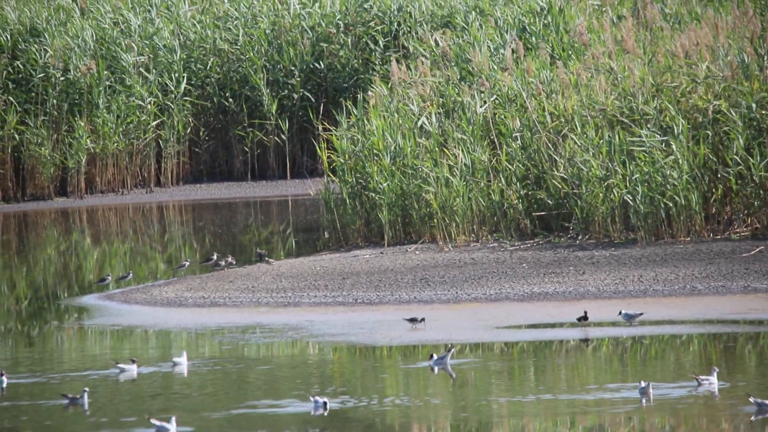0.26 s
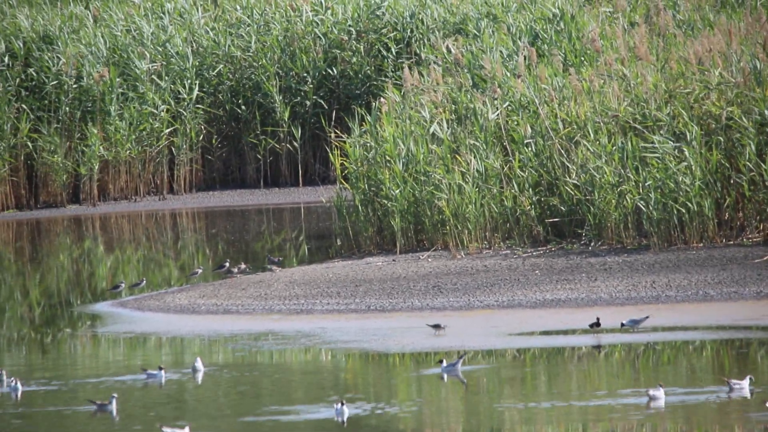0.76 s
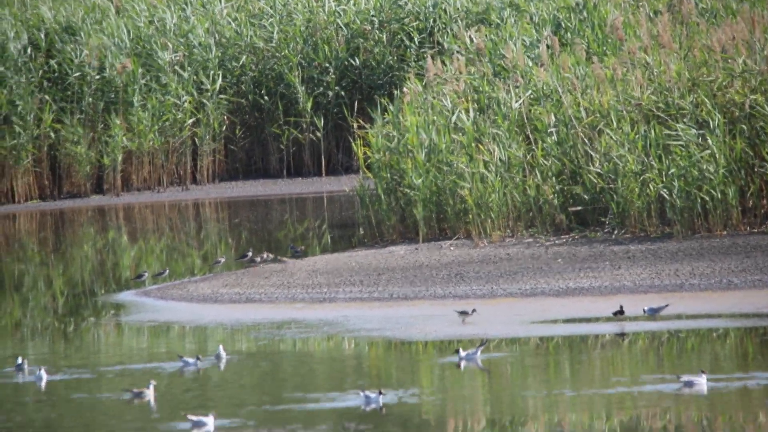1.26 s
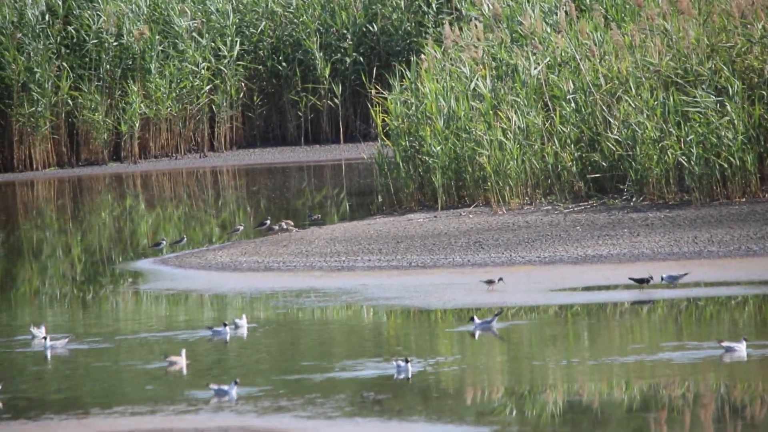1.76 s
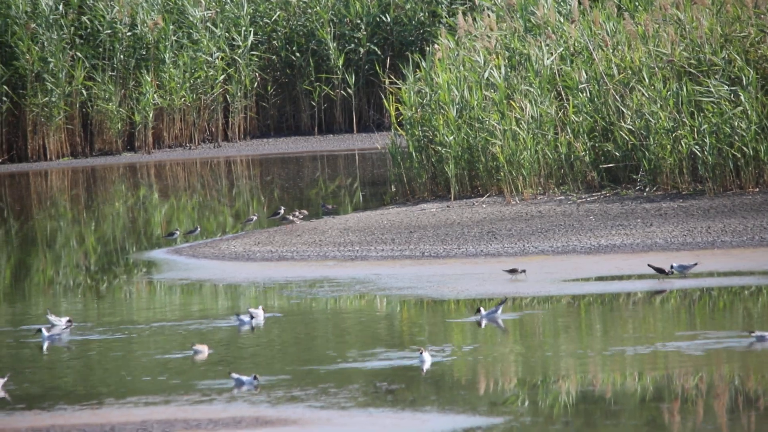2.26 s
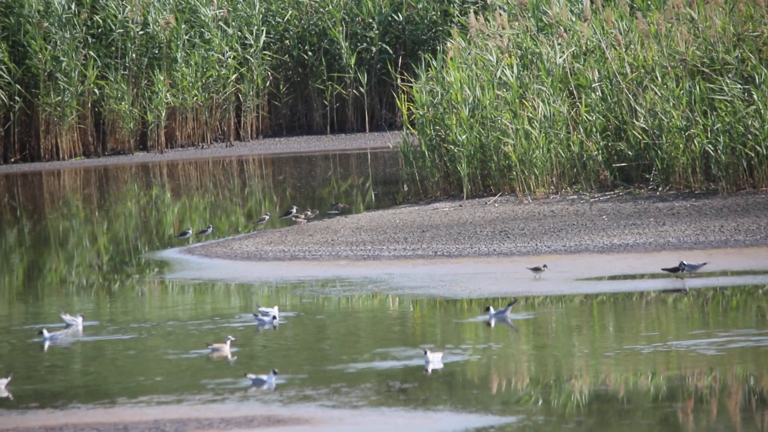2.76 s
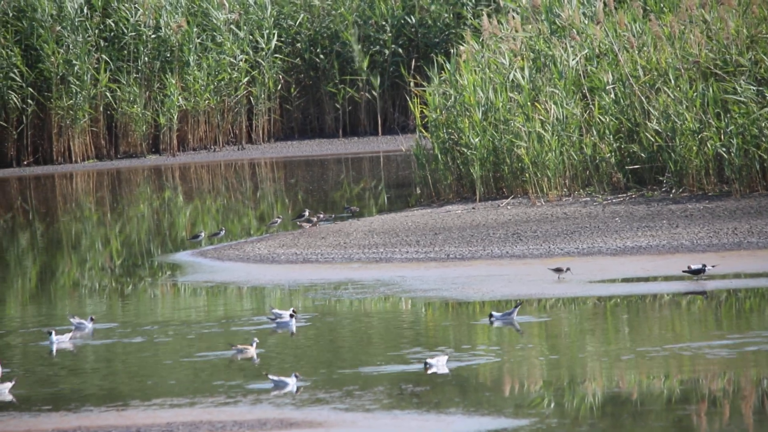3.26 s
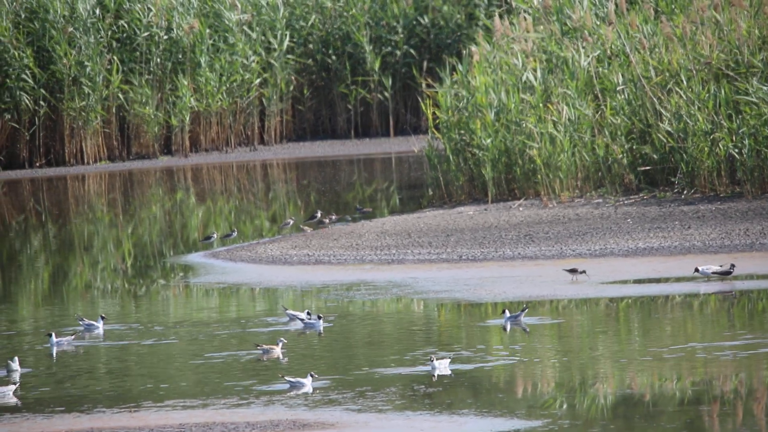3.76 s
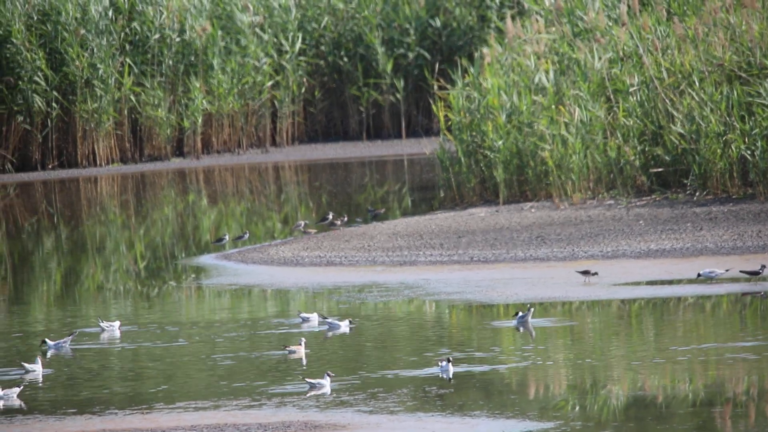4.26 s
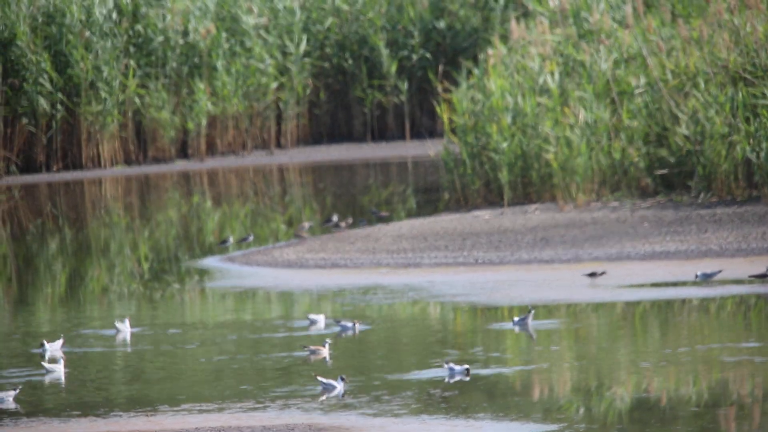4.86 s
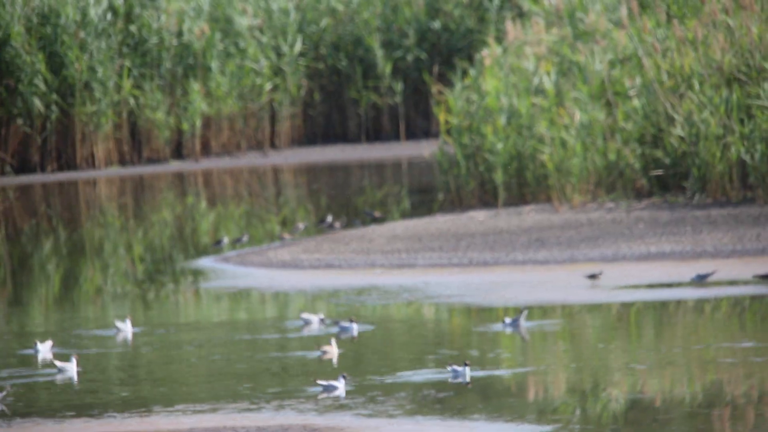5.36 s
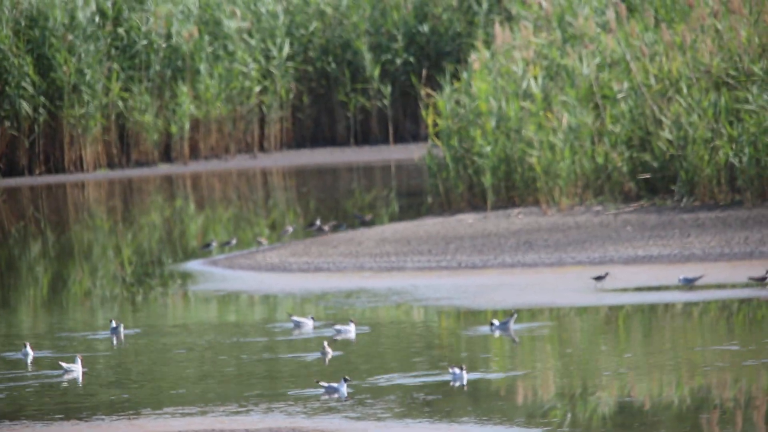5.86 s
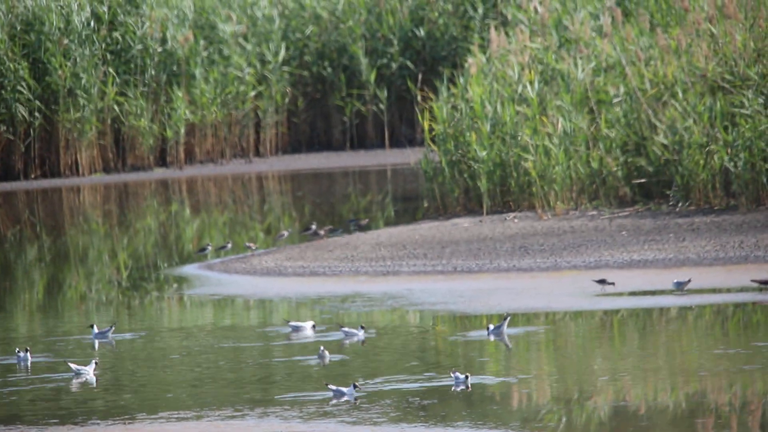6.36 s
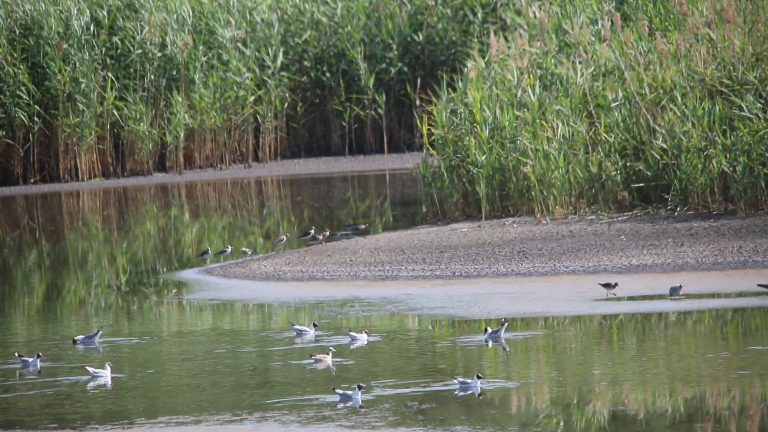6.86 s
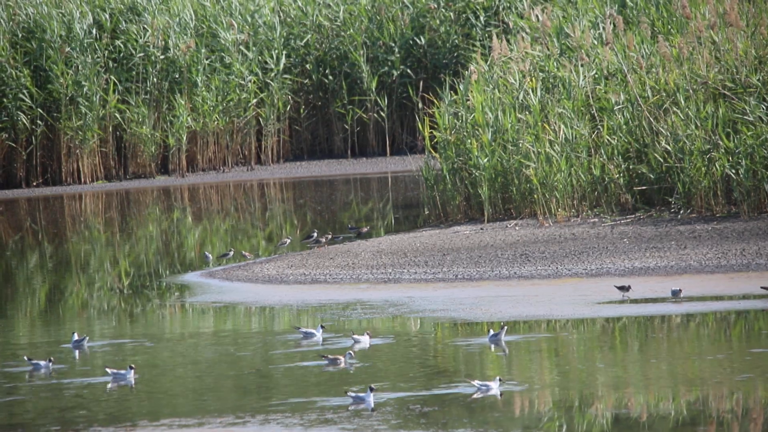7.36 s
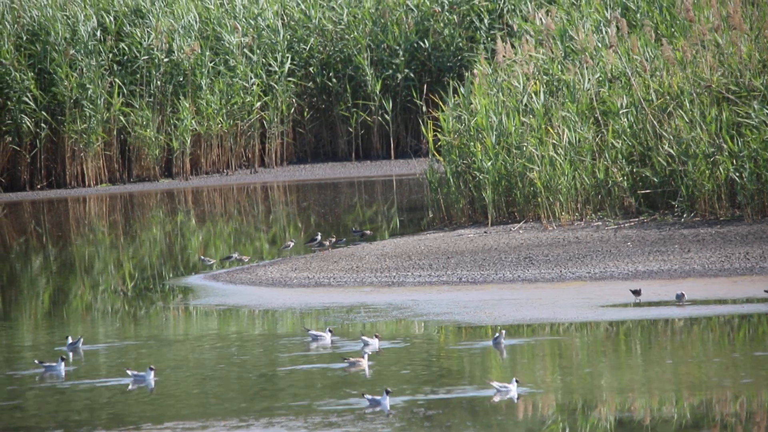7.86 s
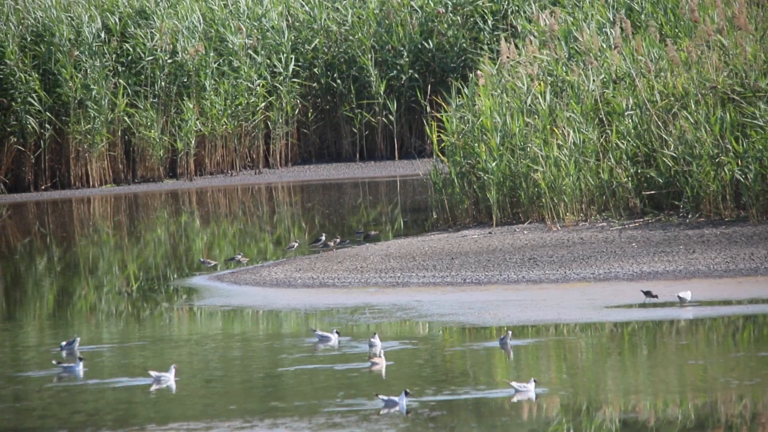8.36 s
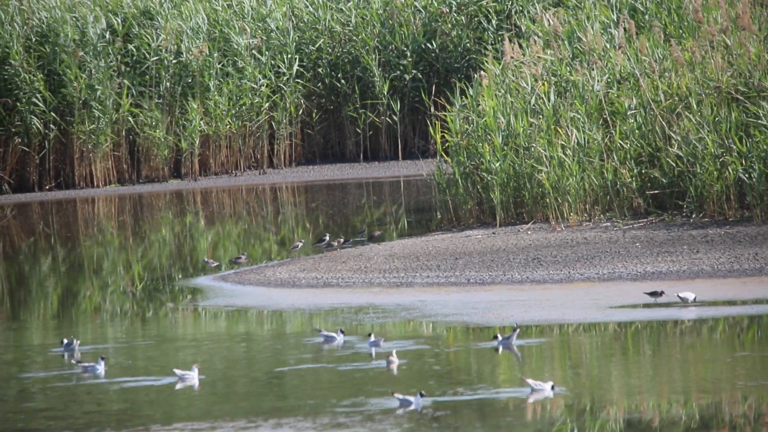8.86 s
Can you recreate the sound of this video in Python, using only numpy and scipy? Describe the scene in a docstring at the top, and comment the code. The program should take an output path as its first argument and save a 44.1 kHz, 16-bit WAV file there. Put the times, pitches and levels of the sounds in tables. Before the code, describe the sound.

Steady short high wader pips, a quick buzzy songbird phrase and faint chirps over a soft reed hush, with low wind buffeting the microphone.

```python
"""Reedy pond, breezy day

Heard from a camera on the bank. A wader to the right repeats a short arched pip, and another bird to the
left sings a slurred, buzzy phrase: both are near sines with drawn pitch curves, scattered by the reeds.
Raspy chips and whistles come from the reeds, with fainter calls from all over the marsh. Shaped noise
makes the gusts at the two microphone ports and the steady hush; decaying modes tick in the camera body."""
import sys
import numpy as np
from scipy import signal
from scipy.fft import rfft, irfft
from scipy.io import wavfile
from scipy.ndimage import uniform_filter1d

SR = 44100
rng = np.random.default_rng(int(sys.argv[2]) if len(sys.argv) > 2 else 0)


def inscribe(sig):
    """Save sig as 16-bit PCM at rate SR to the path in sys.argv[1].

    A 1-D sig is mono; a 2-D sig holds one channel per row.
    Samples are clipped to [-1, 1] before scaling.
    """
    pcm = np.round(np.clip(np.atleast_2d(sig).T, -1, 1) * 32767)
    wavfile.write(sys.argv[1], SR, pcm.astype(np.int16))


N = 402191  # length in samples


def gain_of(db):
    """Decibels to amplitude."""
    return 10 ** (np.asarray(db) / 20)


def evened(x):
    """Scales to rms 1."""
    return x / np.sqrt(np.mean(x ** 2) + 1e-20)


def read(points, hz):
    """Reads a curve of (Hz, value) points on a log-frequency axis."""
    f, value = np.transpose(points)
    return np.interp(np.log(hz + 1), np.log(f + 1), value)


def add(mix, s, sound):
    """Adds a sound into the mix at time s, in place."""
    part = mix[..., max(round(s * SR), 0):][..., :sound.shape[-1]]
    part += sound[..., :part.shape[-1]]


def panned(side_db):
    """Gains of the left and right ports for a left-right difference."""
    return gain_of(np.array([[.5], [-.5]]) * side_db)


def wander(hz):
    """Smooth random curve of about rms 1: noise under a Gaussian low-pass of width hz."""
    size = 2 ** 19
    f = np.fft.rfftfreq(size, 1 / SR)
    spectrum = rfft(rng.standard_normal(size)) * np.exp(-.5 * (f / hz) ** 2)
    return evened(irfft(spectrum)[:N])


def swell(u, top, edge_db, curve):
    """Level in dB of a swell that peaks at u = top and is edge_db down at u = 0 and 1."""
    top = np.clip(top, .05, .95)
    return -edge_db * np.maximum((top - u) / top, (u - top) / (1 - top)) ** curve


def whistle(hz, db):
    """A syrinx tone: a near sine with soft ends."""
    phase = 2 * np.pi * np.cumsum(hz) / SR
    soft_ends = signal.windows.tukey(len(hz), .1)
    return np.sqrt(2) * gain_of(db) * np.sin(phase) * soft_ends


def traced(rows):
    """Joins rows (s, ..) by straight lines: the times and one curve a column."""
    s, *columns = np.transpose(rows)
    t = np.arange(s.min(), s.max(), 1 / SR)
    return [t] + [np.interp(t, np.sort(s), c) for c in columns]


def reeds(x, near_db, near_t60, far_db, far_t60):
    """Stems scatter a call at once; the far reed wall returns a fainter, longer tail (t60 in s)."""
    t = np.arange(SR) / SR
    # sparse random echoes, about 8 % of the samples
    near, far = rng.standard_normal((2, 2, SR)) * (rng.random((2, 2, SR)) < .08)
    near = near * 1000 ** (-t / near_t60) * (1 - np.exp(-t / 0.0059))
    far = far * 1000 ** (-t / far_t60) * (1 - np.exp(-t / 0.11))
    tail = (gain_of(near_db) * evened(near) + gain_of(far_db) * evened(far)) / np.sqrt(SR)
    return signal.fftconvolve(x, tail, axes=1)[:, :N]


def wader(side_db=-5.5, trim_db=1.0, near_db=-12, far_db=-19, echo_s=.027, echo_db=-12):
    """Each pip is a short arch of pitch; on the rise the voice may break to a lower note for an instant."""
    # pips: loudest_s, level_db (before trim_db), top_pitch_hz, rise_s, voice_break (0-1)
    pips = [(.735, -44.5, 3040, 0.029, 0), (1.168, -45.5, 3030, 0.034, .35), (1.538, -47, 2980, 0.038, 0.2),
            (1.899, -47, 3000, .042, .45), (2.253, -44.5, 2984, 0.04, .85), (2.613, -44.5, 2996, .046, 0.3),
            (2.948, -43.5, 3000, .041, .95), (3.284, -41.5, 3040, 0.038, 1),
            (5.117, -34.5, 2950, .031, 0.2), (6.724, -43, 2970, .03, .3), (7.344, -44.5, 2970, .03, 0.6),
            (7.987, -40.5, 2936, 0.031, 0.64)]
    # rise: time (share of rise_s from the loudest moment), pitch (factor), level_db (relative)
    pip_rise = [(-1, .8, -17), (-.75, .94, -8), (-.5, .99, -6.5), (-.3, 1, -4), (-.12, .98, -1)]
    # fall: time_s (from the loudest moment), pitch (factor), level_db (relative)
    pip_fall = [(0, .945, 0), (.007, .905, -3.5), (.016, .87, -15), (.025, .87, -24)]
    break_at, break_width = 0.63, 0.18  # time before the loudest moment and half width, shares of rise_s
    break_pitch, break_db = .69, -7.5  # pitch factor, level relative to the pip

    voice, out = np.zeros(N), np.zeros((2, N))
    for s, db, hz, rise_s, breaks in pips:
        rise = [(share * rise_s, pitch, level) for share, pitch, level in pip_rise]
        t, bend, swell_db = traced(rise + pip_fall)
        low = np.clip(breaks, 0, 1) * np.exp(-((t / rise_s + break_at) / break_width) ** 4)
        full_note = whistle(hz * bend, db + swell_db)
        broken_note = whistle(hz * bend * break_pitch, db + break_db)
        add(voice, s + t[0], (1 - low) * full_note + low * broken_note)
    # the bird is to the right, so the left port hears it later
    add(out[0], .00016, voice)
    add(out[1], 0, voice)
    out = out * gain_of(trim_db)
    heard = out * panned(side_db)
    heard = heard + reeds(out, near_db=near_db, near_t60=0.14, far_db=far_db, far_t60=0.85)
    # the ragged edge of the bank smears its echo
    bank = evened(rng.standard_normal((2, SR // 30))) / np.sqrt(SR // 30)
    add(heard, echo_s, gain_of(echo_db) * signal.fftconvolve(out, bank, axes=1))
    return heard


def songbird(buzz_hz=105, side_db=9.0, trim_db=-11.0, near_db=-1.5, far_db=-13):
    """Each syllable is one swelling bend of pitch; a fast uneven flutter of the pitch makes it buzz."""
    # syllables: start_s, length_s, first_hz, middle_hz, last_hz, level_db (before trim_db),
    # loudest_point (0-1), buzz_depth_hz
    song = [(3.456, .115, 4490, 4850, 4120, -47.5, 0.2, 300),
            (4.421, .03, 4410, 5040, 4700, -35.5, 0.34, 50), (4.441, 0.034, 4650, 4290, 3700, -39, 0.4, 50),
            (4.476, 0.027, 3610, 2990, 3750, -38, 0.95, 50),
            (4.562, 0.035, 2900, 4000, 5300, -41, 0.84, 450), (7.755, .13, 3150, 3220, 3370, -51, .6, 200),
            (7.87, 0.041, 3330, 3870, 4370, -40.5, 0.44, 500),
            (7.915, 0.056, 4880, 5000, 4980, -38, 0.1, 55),
            (7.944, 0.028, 4640, 4050, 3960, -33.5, 0.3, 70),
            (8.034, 0.043, 3890, 3703, 3650, -34.5, 0.42, 35),
            (8.07, 0.039, 3694, 3655, 3590, -30.5, .6, 199),
            (8.098, 0.0246, 3570, 3440, 3300, -32.5, 0.4, 35),
            (8.176, 0.023, 5200, 4880, 4650, -39, .5, 380),
            (8.198, 0.028, 4450, 3830, 3870, -31.5, 0.3, 90),
            (8.271, 0.022, 3580, 3370, 3050, -37, 0.4, 40),
            (8.293, 0.065, 3010, 2950, 3210, -40.5, .3, 190),
            (8.349, 0.045, 3150, 3370, 3470, -33, 0.54, 60),
            (8.434, 0.039, 4900, 4880, 5350, -37.5, .5, 380),
            (8.467, 0.058, 5500, 5680, 5700, -43.5, 0.15, 210),
            (8.629, 0.044, 2570, 3700, 3940, -40, 0.7, 260),
            (8.709, 0.044, 5450, 4870, 4640, -38.5, 0.1, 90),
            (8.714, .045, 5800, 6000, 6050, -47, .45, 330), (8.793, .17, 4350, 3860, 3470, -45.5, 0.5, 403)]
    edge_db, curve = 8.5, 0.59  # drop from the loudest point to either end, roundness of the top

    uneven_hz = buzz_hz * (1 + .12 * wander(25))
    flutter = np.sin(2 * np.pi * np.cumsum(uneven_hz) / SR) + .5 * wander(350)
    out = np.zeros((2, N))
    for s, length, first_hz, middle_hz, last_hz, db, top, buzz_depth_hz in song:
        u = np.linspace(0, 1, int(length * SR))
        # a parabola through the three pitches
        bend = np.polyval(np.polyfit([0, .5, 1], [first_hz, middle_hz, last_hz], 2), u)
        hz = bend + buzz_depth_hz * flutter[int(s * SR):][:len(u)]
        syllable = whistle(hz, db + trim_db + swell(u, top, edge_db, curve))
        add(out, s, syllable * panned(side_db))
    return out + reeds(out, near_db=near_db, near_t60=0.24, far_db=far_db, far_t60=0.88)


def chip(length, first_hz, last_hz, db, rasp_hz, jitter, arch_hz=0):
    """One swelling glide, straight or arched, made raspy by a jitter of the pitch."""
    u = np.linspace(0, 1, max(int(length * SR), 64))
    arch = np.sin(np.pi * u)
    rasp = rasp_hz * jitter[rng.integers(N // 2):][:len(u)]
    hz = first_hz + (last_hz - first_hz) * u + arch_hz * arch + rasp
    return whistle(hz, db) * arch


def reed_birds(chips_trim_db=-3.0, whistles_trim_db=-5.5):
    """The nearer chips and whistles: short raspy glides of pitch, each from its own place."""
    # raspy gliding chips: middle_s, length_s, pitch_hz, fall (share of the pitch, negative rises),
    # level_db (before chips_trim_db), left_right_db
    chips = [(0.618, .07, 3950, -0.21, -59, 8), (0.7, 0.054, 6150, .08, -54, 1),
             (.718, .045, 4620, -.08, -55, 6), (.79, 0.046, 5600, .38, -52.5, 0),
             (0.85, .03, 3570, 0.41, -54, 10), (0.946, .03, 3550, .4, -55.5, 7),
             (1.095, .06, 4560, .15, -59, 9), (1.145, 0.032, 3730, .35, -54, 7),
             (1.252, .025, 3980, .45, -57, 7), (1.616, .036, 6050, .3, -56.5, 1),
             (1.724, .05, 6700, 0.4, -60, 1), (3.133, 0.022, 4520, .16, -50.5, 11),
             (3.166, 0.021, 4320, 0.21, -49, 8), (3.636, 0.013, 5280, .2, -53, 13),
             (4.072, 0.022, 5690, -0.45, -49.5, 12), (4.088, 0.022, 5040, 0.47, -48, 10),
             (4.777, 0.034, 5040, 0.357, -52.5, 12), (4.872, 0.028, 4930, 0.39, -54, 10),
             (4.954, .03, 4320, 0.15, -56, 8), (5.029, 0.021, 5160, .38, -53, 14),
             (5.277, .06, 5280, .08, -61, 7), (5.628, .035, 5050, .1, -58, 13),
             (8.55, 0.079, 2710, 0.4, -56, 10)]
    # soft bent whistles: middle_s, length_s, first_hz, last_hz, arch_height_hz,
    # level_db (before whistles_trim_db), left_right_db
    whistles = [(.008, 0.022, 3040, 2760, 40, -50, 15), (0.081, .08, 2790, 3260, 129, -53, 10),
                (.197, .07, 2330, 2330, 22, -55.5, 1), (0.277, 0.16, 3794, 4100, 35, -51, 8),
                (2.42, 0.056, 3150, 2290, 50, -54.5, 6), (2.559, 0.087, 2650, 2800, 420, -56, 7),
                (2.739, 0.094, 2630, 2640, 500, -54.5, 8), (3.365, 0.028, 3170, 2750, 72, -50, 9),
                (3.936, 0.049, 4430, 4120, -130, -49, 4), (4.604, .6, 2950, 2945, -1, -61.5, 2),
                (5.044, .1, 2930, 2990, 27, -54, 6), (6.38, .11, 3820, 2650, -130, -58, 3),
                (6.535, 0.071, 2280, 3130, 38, -60, 3), (6.752, 0.032, 2960, 2950, 80, -56, 0)]
    chip_rasp, whistle_rasp_hz = 0.06, 55  # the chips' rasp is a share of their pitch

    out, jitter = np.zeros((2, N)), wander(610)
    for s, length, hz, fall, db, side_db in chips:
        first_hz, last_hz = hz * (1 + fall / 2), hz * (1 - fall / 2)
        call = chip(length, first_hz, last_hz, db + chips_trim_db, chip_rasp * hz, jitter)
        add(out, s - length / 2, call * panned(side_db))
    for s, length, first_hz, last_hz, arch_hz, db, side_db in whistles:
        call = chip(length, first_hz, last_hz, db + whistles_trim_db, whistle_rasp_hz, jitter, arch_hz)
        add(out, s - length / 2, call * panned(side_db))
    return out + reeds(out, near_db=-3, near_t60=.17, far_db=-12, far_t60=.6)


def far_birds(count=60, softest_db=-67, low_hz=2300, high_hz=4800, rasp_hz=220):
    """Faint raspy glides at random times from all over the marsh, heard only through the reeds."""
    out, jitter = np.zeros((2, N)), wander(520)
    for when, pitch, glide, size, side in rng.random((count, 5)):
        hz = low_hz * (high_hz / low_hz) ** (pitch ** 2)  # low pitches are likelier
        last_hz = hz * (.85 + .3 * glide)
        call = chip(.03 + .08 * size, hz, last_hz, softest_db + 3 * size, rasp_hz, jitter)
        add(out, when * N / SR, call * panned(10 * side - 3))
    return reeds(out, near_db=0, near_t60=.1, far_db=-10, far_t60=.6)


def gust_levels():
    """Wind level in dB at the two ports: each gust swells and dies over a light breeze."""
    # gusts, levels before each port's trim: peak_s, length_s, left_level_db, right_level_db
    gusts = [(0.382, 0.13, -37, -43), (0.624, 0.15, -32.5, -28), (0.743, 0.13, -46, -28.5),
             (0.972, 0.084, -49, -34), (1.208, 0.15, -48, -37.5), (1.527, 0.21, -53.5, -65),
             (1.7, 0.049, -48, -40), (2.005, 0.055, -47, -50), (2.22, 0.22, -57.5, -55),
             (3.012, 0.063, -62, -40), (3.331, .25, -51, -31), (3.572, 0.18, -51, -33),
             (3.799, 0.055, -53, -35.5), (4.073, 0.11, -55, -31.5), (4.581, 0.11, -49, -32.5),
             (4.795, 0.11, -37, -39), (5.137, 0.22, -56, -44), (6.996, 0.24, -57, -41),
             (7.244, 0.22, -53, -34.5), (7.497, 0.13, -56, -42.5), (7.826, .25, -62, -48),
             (8.043, 0.14, -48.5, -54), (8.293, 0.71, -63, -44.5), (8.754, 0.2, -58, -36.5),
             (9.051, 0.074, -55, -37.5)]
    rise, edge_db, curve = .45, 5.5, 1.43  # share of the length spent rising, drop at the ends, roundness
    breeze_left_db, breeze_right_db = -62, -65  # between gusts, before each port's trim

    t = np.arange(0, N / SR, .002)
    power = gain_of([[breeze_left_db], [breeze_right_db]]) ** 2
    for s, length, left_db, right_db in gusts:
        shape_db = swell((t - s) / length + rise, rise, edge_db, curve)
        power = power + gain_of([left_db + shape_db, right_db + shape_db]) ** 2
    return [np.interp(np.arange(N) / SR, t, 10 * np.log10(port)) for port in power]


def wind(level, trim_db, lumps_db=7.0, eddy_hz=22, brighten=0.65, knee_hz=90, strong_db=-34):
    """Eddies hit one port in lumps; a stronger gust makes smaller eddies and so a higher rumble."""
    # rumble of a gust at strong_db: frequency_hz, density_db (per Hz, shape only)
    rumble_shape = [(15, -28), (27, -21), (45, 2.5), (70, 0), (150, -0.5), (220, -8), (300, -20.5),
                    (450, -31.5), (800, -47), (1600, -72)]
    eddies = evened(rng.standard_normal(N) * gain_of(lumps_db * wander(eddy_hz)))
    hz, t, z = signal.stft(eddies, SR, nperseg=2048)
    excess_db = np.interp(t, np.arange(N) / SR, level) - strong_db
    octaves = np.log2(np.clip(hz / knee_hz, 1, 4))[:, None]
    shape_db = read(rumble_shape, hz)[:, None] + brighten * octaves * excess_db
    rumble = signal.istft(z * gain_of(shape_db), SR, nperseg=2048)[1][:N]
    # dividing by the smoothed power leaves the slow level to the gust alone
    window = signal.windows.hann(SR // 6)
    power = signal.fftconvolve(rumble ** 2, window / window.sum(), "same")
    return rumble / np.sqrt(abs(power) + 1e-20) * gain_of(level + trim_db)


def buffeting(leak=0.19, leak_hz=35, thump_s=0.00096):
    """Each port has its own eddies; the slowest pushes on the windward right one reach the left too."""
    # single hard eddies that thump the right port: middle_s, peak_db
    thumps = [(0.607, -22.5), (.643, -26), (.709, -21), (0.743, -19.5), (.795, -21.5), (3.257, -22),
              (3.317, -26.5), (3.401, -20.5), (3.577, -24), (3.613, -25), (4.05, -19)]
    at_left, at_right = gust_levels()
    left = wind(at_left, trim_db=3.5, strong_db=-22)
    right = wind(at_right, trim_db=0.5)
    u = np.arange(-SR // 100, SR // 100) / SR / thump_s
    thump = u * np.exp(.5 - .5 * u ** 2)  # a suck, then a push
    for s, db in thumps:
        add(right, s - len(u) / 2 / SR, gain_of(db) * thump)
    leaked = signal.lfilter(*signal.butter(1, leak_hz, fs=SR), right)
    return np.array([left + leak * leaked, right])


def camera_ticks(side_db=0, scrape=0.68):
    """Small blows ring the decaying modes of the plastic body; a wandering phase roughens each mode."""
    # blows: start_s, level_db, brightness_db (per octave, about 1 kHz)
    ticks = [(5.299, -37.5, -13.5), (5.432, -45, 4), (5.436, -36.5, -5), (5.443, -39.5, 8),
             (5.4448, -35.5, 1.5)]
    # modes of the body: frequency_hz, level_db (relative), t60_s
    body = [(560, -8, 0.036), (800, -2, 0.029), (1183, -5.5, 0.047), (1990, -5.5, 0.02), (2320, -11, 0.041),
            (3000, -25, .01), (5630, -30, 0.018), (7000, -37, 0.024)]
    out, t = np.zeros((2, N)), np.arange(SR // 20) / SR
    for s, db, bright in ticks:
        for hz, mode_db, t60 in body:
            slip = scrape * np.cumsum(rng.standard_normal((2, len(t))), axis=1) * np.sqrt(hz / SR)
            ring = np.sin(2 * np.pi * hz * t + slip) * 1000 ** (-t / t60)
            add(out, s, gain_of(db + mode_db + bright * np.log2(hz / 1000)) * ring)
    return out * panned(side_db)


def crisp_tick(s=3.946, level_db=-48, low_hz=500, high_hz=8000):
    """One dry, bright tick close to the microphone: band-passed noise in a short bell-shaped burst."""
    u = np.arange(-SR // 50, SR // 50) / SR / .0035  # time in units of 3.5 ms
    band = signal.butter(2, [low_hz, min(high_hz, SR / 2 - 1)], "bandpass", fs=SR)
    grit = evened(signal.lfilter(*band, rng.standard_normal((2, len(u)))))
    out = np.zeros((2, N))
    add(out, s - len(u) / 2 / SR, gain_of(level_db) * grit * np.exp(-.5 * u ** 2))
    return out


def hush(level_db=-51, patchy_db=0.59, fade_db=0.83):
    """Wide soft noise of leaves and distance, in drifting patches, easing slowly from start to end."""
    # spectrum: frequency_hz, density_db (per Hz, shape only)
    hush_shape = [(25, 8), (60, 5.5), (200, 3), (400, 2), (800, 0), (1400, -1), (2300, -2), (3300, -4),
                  (5000, -7), (7000, -12), (10000, -18), (15500, -25.5)]
    # balance of the ports: frequency_hz, left_right_db
    hush_side = [(60, -5.5), (200, 4), (1300, 2.5), (4400, 3.5), (8100, 1.5), (15000, 0)]
    # likeness of the ports: frequency_hz, correlation (-1 to 1)
    hush_same = [(60, 0.25), (640, 0.27), (1400, 0.12), (2700, -0.26), (6000, 0.084), (15000, .03)]

    frames, hz = N // 256 + 5, np.fft.rfftfreq(1024, 1 / SR)
    a, b, c, d, patches = rng.standard_normal((5, frames, len(hz)))
    patches = uniform_filter1d(patches, size=16, axis=0)  # over time
    patches = evened(uniform_filter1d(patches, size=14, axis=1))  # over frequency
    same = np.clip(read(hush_same, hz), -1, 1)
    left = a + 1j * b
    right = same * left + np.sqrt(1 - same ** 2) * (c + 1j * d)
    outdoors = 1 / (1 + (hz / 6000) ** 2)  # the highest hiss stays steady
    fade = fade_db * np.linspace(1, -1, frames)[:, None]
    drift_db = outdoors * (patchy_db * patches + fade)
    z = np.array([left, right]) * gain_of(read(hush_shape, hz) + drift_db)
    z = z * panned(read(hush_side, hz))[:, None]
    noise = signal.istft(z.transpose(0, 2, 1), nperseg=1024, noverlap=768)[1][:, :N]
    return gain_of(level_db) * evened(noise)


def scene():
    """Birds over the hush, with wind and handling at the microphone."""
    birds = wader() + songbird() + reed_birds() + far_birds()
    at_the_microphone = buffeting() + camera_ticks() + crisp_tick()
    return birds + at_the_microphone + hush()


def record(dry, edge_hz=15750):
    """The recorder's band limit: a steep linear-phase low-pass."""
    low_pass = signal.firwin(511, edge_hz, window=("kaiser", 9), fs=SR)
    return signal.oaconvolve(dry, low_pass[None], "same")


dry = scene()
out = record(dry)
inscribe(out)
```